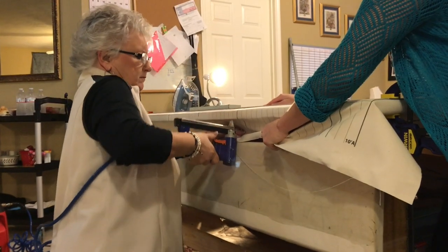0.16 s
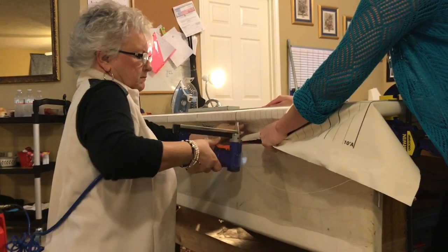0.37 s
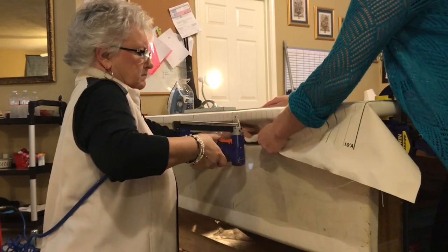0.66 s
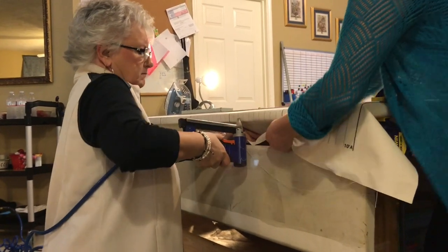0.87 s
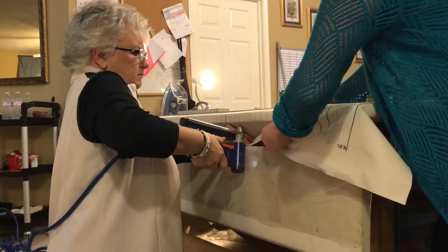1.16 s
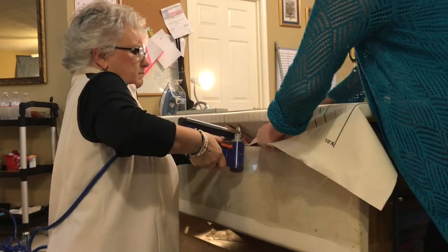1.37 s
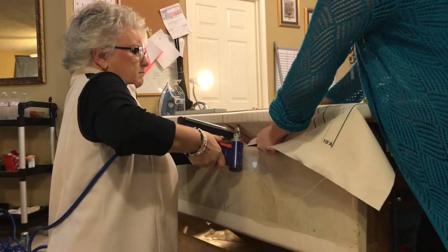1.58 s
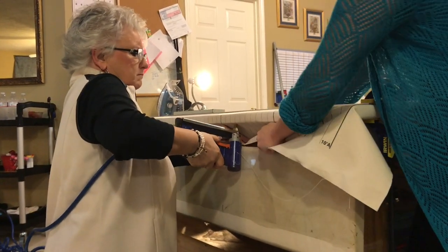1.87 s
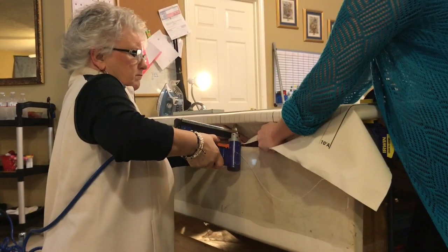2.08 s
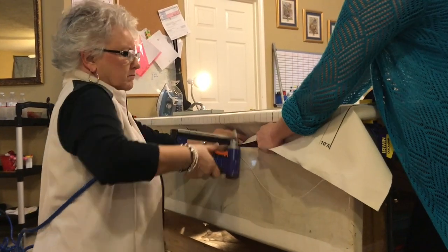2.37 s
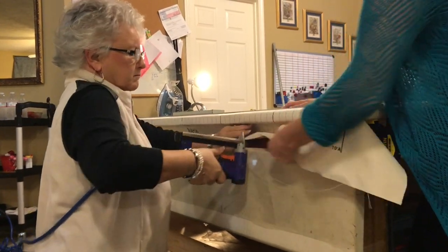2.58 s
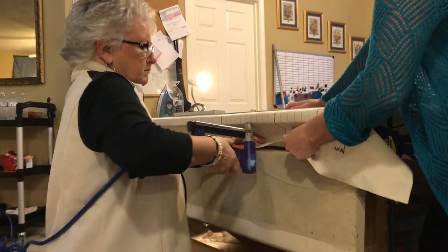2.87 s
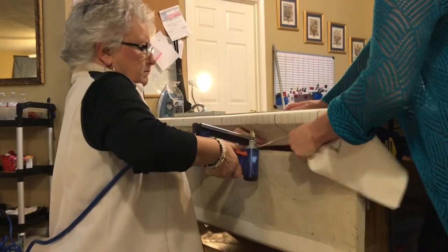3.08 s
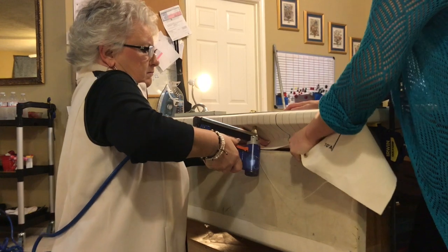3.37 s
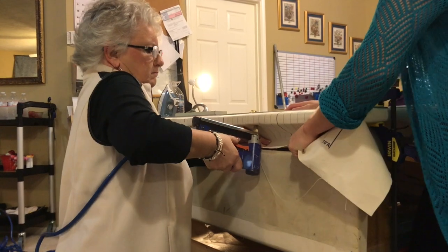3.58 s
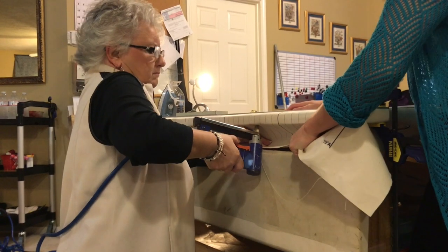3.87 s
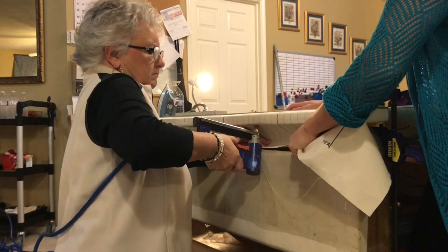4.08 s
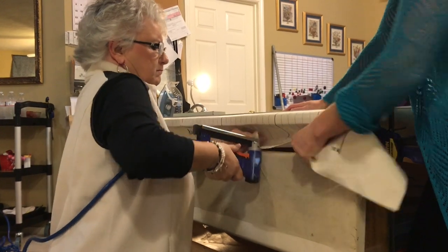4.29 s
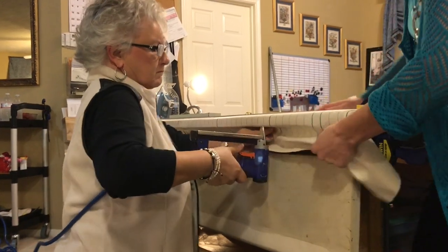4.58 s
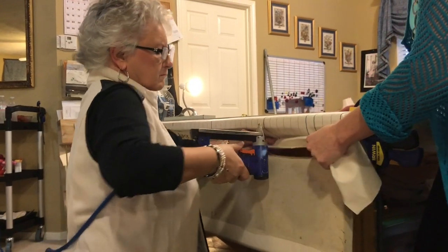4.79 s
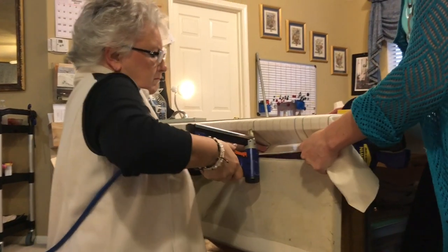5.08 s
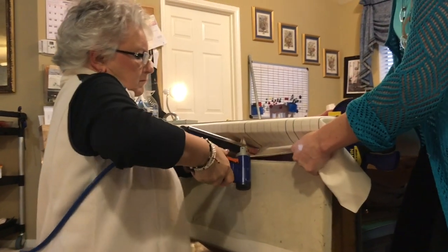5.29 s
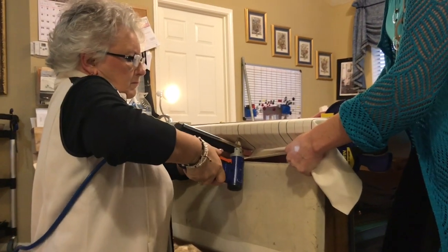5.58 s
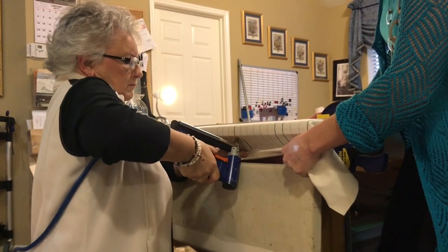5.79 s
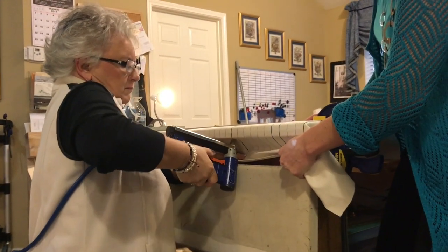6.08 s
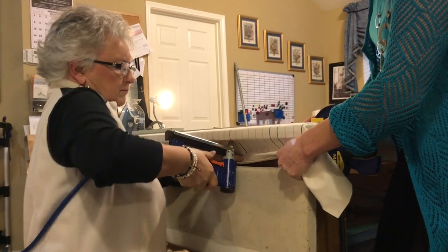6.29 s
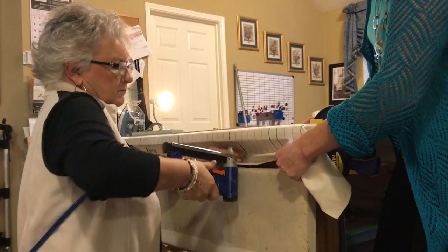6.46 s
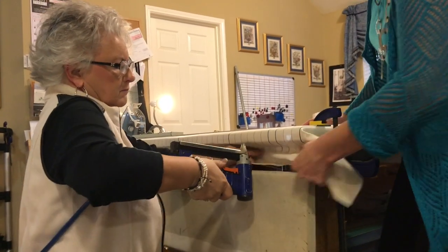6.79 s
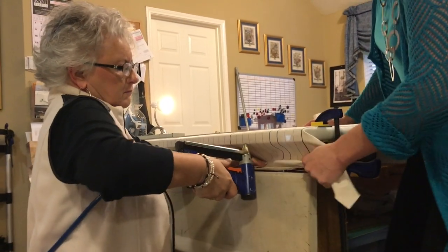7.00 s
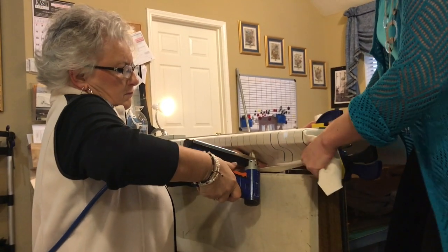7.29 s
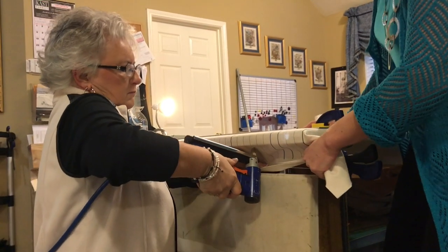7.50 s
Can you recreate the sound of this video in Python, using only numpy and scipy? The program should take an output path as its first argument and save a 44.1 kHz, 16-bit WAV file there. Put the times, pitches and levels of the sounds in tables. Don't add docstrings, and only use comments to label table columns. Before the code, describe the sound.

An air staple gun fires sharp double cracks into a hollow wooden box in a small workroom, with cloth rustling and soft bumps between shots.

```python
import sys
import numpy as np
from scipy import signal
from scipy.fft import rfft, irfft
from scipy.io import wavfile
from scipy.ndimage import uniform_filter1d

SR = 44100
rng = np.random.default_rng(int(sys.argv[2]) if len(sys.argv) > 2 else 0)


def bounce(signal):
    frames = np.transpose(np.atleast_2d(signal))
    limited = np.clip(frames, -1, 1)
    pcm = np.round(limited * 32767).astype(np.int16)
    wavfile.write(sys.argv[1], SR, pcm)


def voltage_ratio(level):
    return 10 ** (np.asarray(level, float) / 20)


N = 336483
LEAD = 8820

# start in seconds, level in dB, hold in ms, tilt in dB per octave.
INLETS = [
    (-.08, -7, 14, -1.5),
    (2.064, -11.5, 16, -3),
    (3.907, -14, 19, -4.5),
    (6.075, -15.5, 12, 1.5),
    (6.088, -13, 18, -1.5),
]
INLET_RISE_MS, INLET_FALL_MS = 6.1, 14
# pitch in Hz, level in dB per Hz.
AIR_COLOUR = [(180, -65), (300, -33), (654, -29), (2120, -9), (2640, -11), (4630, -6.5), (5120, -8.5),
              (5750, -8), (6460, -5.5), (13400, -8.5), (15800, -10.5)]
# start in seconds, level in dB, rattle in ms, tilt in dB per octave, boom in dB.
BLOWS = [(-.078, -12.5, 43.5, 0.5, -18), (2.063, -13.5, 20.2, 1.1, -19.5), (2.086, -12.5, 19.9, 1, -25),
         (3.908, -15, 19.7, -5, -26.5), (3.927, -15.5, 18, -1.7, -24.5), (6.097, -10.5, 8.8, 3.5, -15),
         (6.108, -12, 5, 4.5, -26)]
# pitch in Hz, level in dB, time to fall 60 dB in seconds.
BOX = [(700, -23.5, 0.015), (829, -6, 0.1), (991, -2.5, 0.072), (1200, -2, 0.042), (1270, 5, 0.0028),
       (1567, -0.5, 0.028), (1930, 2, 0.018), (2330, -1.5, 0.0061), (2450, -0.5, 0.033),
       (2740, -4.5, 0.011), (2900, -8, 0.013), (3900, -11, 0.0079)]
# pitch in Hz, level in dB, time to fall 60 dB in seconds.
HOLLOW = [(250, -12, .04), (327, 10, 0.13), (385, 10, 0.096), (490, -4.5, 0.053)]

# pitch in Hz, level in dB per Hz.
HUSH_COLOUR = [(35, -66), (60, -28.5), (96, -28.5), (130, -12), (171, -13), (227, -4), (286, -8.5),
               (436, -9.5), (1940, -18), (13400, -31), (15800, -34)]
HUSH_DB = -62.5
# time in seconds, pitch in Hz, level in dB.
MOTOR = [(0, 254.6, -52.5), (1.0, 258.8, -67), (1.9, 250, -67), (2.601, 246, -66), (3.3, 239.1, -75.5),
         (3.8, 244.6, -66.5), (4.6, 234.7, -69.5), (5.2, 228.1, -67.5), (6.0, 231.2, -64.5),
         (6.6, 226, -61), (6.95, 225.7, -53), (7.3, 223, -63.5), (7.63, 220.8, -61)]
HUM_HZ, HUM_DB = 121, -70.5

# start in seconds, level in dB, rise in ms.
VENTS = [(.124, -20.5, 9.6), (2.284, -20.5, 9), (4.137, -22, 4.7), (6.346, -22, 8.4)]
VENT_SHUTS_MS, VENT_FALL_MS, VENT_TILT_DB = 3.7, 3.9, -1.7
# start in seconds, level in dB, rattle in ms, pitch factor, pushed air in dB.
POPS = [(.128, -14, 8.3, 1.05, -8), (.146, -23.5, 8.8, 0.62, 4), (2.280, -24, 11.5, 0.77, -13.5),
        (2.287, -20.5, 13, 1.07, -16.5), (2.306, -18.5, 11.1, 1.35, -16.5), (4.138, -15.5, 6.8, .93, -7),
        (4.158, -24.5, 9.6, 0.82, -9), (4.169, -20.5, 8.4, 1.41, -14.5), (6.339, -32, 4.7, 1.6, -17.5),
        (6.346, -22, 16.4, 0.81, -12.5), (6.357, -19, 18, 1.1, -9.5), (6.372, -21.5, 10, 1.4, -10.5)]
POP_TILT_DB = 2.5
# pitch in Hz, level in dB, time to fall 60 dB in seconds.
CHAMBER = [(626, -10, 0.01), (770, -4, 0.0047), (910, 4.5, 0.019), (1090, 3.5, 0.015), (1300, 3, 0.0092),
           (1524, 3.5, 0.011), (2257, -13.5, 0.02)]
# pitch in Hz, level in dB, time to fall 60 dB in seconds.
PUSHED_AIR = [(200.2, -15.5, 0.028), (338, -4, 0.039), (385, 8, 0.052), (447, 3, 0.087)]

# start in seconds, level in dB, barrel ring in dB, puff in dB,
# puff tilt in dB per octave.
CLACKS = [(.161, -19.5, -14.5, -13, 4), (2.310, -24, 0.7, -11.5, 2.5), (4.170, -18, -9.5, -14.5, 0.5),
          (6.372, -23.5, -14, -11.5, 0.7)]
# pitch in Hz, level in dB, time to fall 60 dB in seconds.
PISTON = [(7370, -7, 0.039), (9500, -13, .07), (9700, 0.5, .065), (14110, -9.5, .05)]
BARREL_HZ, BARREL_T60 = 3780, .1
# rise, hold and fall in ms.
PUFF_MS = (4, 5.4, 4.9)
PUFF_LEAD_S = .0012

# time in seconds, drag on the box in dB.
SLIDES = [
    [(.3, -56), (.486, -49.5), (.626, -55), (.728, -49.5), (.954, -48), (1.042, -53), (1.224, -62.5),
     (1.644, -67), (2.03, -69)],
    [(2.48, -50), (2.952, -50.5), (3.04, -51.5), (3.076, -54.5), (3.168, -58), (3.44, -67.5), (3.87, -69.5)],
    [(4.32, -46), (4.728, -50.5), (4.81, -55), (4.942, -57.5), (5.062, -72.5), (6.03, -66.5)],
    [(6.52, -46.5), (6.622, -50), (6.84, -48.5), (7.008, -56), (7.202, -64), (7.63, -66)],
]
WEAVE_DB = (-56.5, -55.5, -54, -55)
FIRM_DRAG_DB, WEAVE_GROWTH = -50, 1.2
# pitch in Hz, level in dB per Hz.
RUB_COLOUR = [(71, -47), (120, -15.5), (210, -15), (243, -2.5), (294, -8.5), (430, -4.5), (762, -6.5),
              (1220, -7), (4000, -26.5), (5200, -50), (8800, -120)]
# pitch in Hz, level in dB per Hz.
WEAVE_COLOUR = [(880, -37.5), (1500, -8.5), (2000, -12), (2430, -10.5), (3470, -12.5), (6330, -15),
                (14300, -23), (15800, -25)]
# middle in seconds, level in dB, half length in seconds.
BRUSHES = [(0.875, -64, 0.2), (1.267, -63.5, 0.1), (1.956, -76, .06), (3.05, -67, .05), (3.663, -76.5, .08),
           (5.899, -71, 0.067), (7.47, -70, .12)]
SCUFF_DB, SCUFF_S = -31, 0.041

# time in seconds, peak in dB, pitch in Hz, brightness in dB.
BUMPS = [(.47, -26.5, 368, -7), (.505, -34, 496, -5), (.526, -30, 385, 8), (.567, -30.5, 415, -2),
         (.661, -32, 423, -13), (.687, -23, 433, -5), (.728, -22, 413, -.6), (.749, -28, 645, -6),
         (1.237, -26, 420, -7), (2.749, -33, 447, 0.1), (2.774, -31, 594, 4), (3.133, -33.5, 345, -12),
         (3.17, -34, 336, -10), (4.549, -37, 634, -3), (4.634, -26.5, 595, -4), (4.695, -36, 326, -5),
         (5.384, -40, 519, 5), (5.919, -45, 369, -4.5), (6.624, -26.5, 590, -14), (6.66, -24, 302, -3),
         (6.689, -31.5, 635, -15), (6.81, -24, 345, 2), (6.868, -28.5, 444, -7), (6.986, -30, 480, -6),
         (7.251, -41, 585, -10)]
BUMP_T60, BUMP_RISE_MS = 0.046, 4.6

# start in seconds, level in dB, tilt in dB per octave.
LEAKS = [(2.267, -24.5, -1.5), (3.896, -40, 5), (4.127, -25.5, -2), (6.062, -29, 3.5), (6.330, -30, 5)]
# rise, hold and fall in ms.
LEAK_MS = (8.6, 5.5, 3.1)

# pitch in Hz, level in dB, time to fall 60 dB in seconds.
THUD = [(149, -17.5, 0.047), (336, -10.5, 0.14), (453, -3.5, .04), (596, 2.5, 0.03), (745, -1, 0.029),
        (1006, -8, 0.026), (1600, -16, 0.014)]
THUD_S, THUD_DB = 2.9022, -12

# pitch in Hz, level in dB,
# time to fall 60 dB in seconds.
BOARD = [(1036, -5, 0.054), (1218, 4, 0.045), (1356, -2, 0.034), (1510, -0.5, 0.045), (1670, -4.5, .035),
         (1850, -3, 0.033), (2070, -4, 0.027), (2306, -5.5, .03), (2480, -4, 0.028), (2630, -6, .03)]
SLAM_S, SLAM_DB, BITE_MS = 6.096, -2, 2.5

# pitch in Hz, time to fall 60 dB in seconds.
ROOM = [(150, 0.34), (400, 0.42), (1000, 0.39), (2500, 0.45), (6000, 0.41), (14000, .24)]
# delay in ms, level in dB.
WALLS = [(2.3, -6), (4.1, -15.5), (7.2, -12), (11.5, -13.5), (16, -10.5)]
WET_DB = -2


def evened(x):
    return x / np.sqrt(np.mean(x ** 2) + 1e-20)


def read(points, hz):
    f, value = np.transpose(points)
    return np.interp(np.log(hz + 1), np.log(f + 1), value)


def silence():
    return np.zeros(N + LEAD)


def add(mix, s, sound):
    part = mix[round(s * SR) + LEAD:][:len(sound)]
    part += sound[:len(part)]


def hiss(colour, size, tilt_db=0.):
    hz = np.fft.rfftfreq(size, 1 / SR)
    gain = voltage_ratio(read(colour, hz) + tilt_db * np.log2((hz + 50) / 6000))
    return evened(irfft(rfft(rng.standard_normal(size)) * gain, size))


def drift(size, smooth):
    once = uniform_filter1d(rng.standard_normal(size), smooth)
    return evened(uniform_filter1d(once, smooth))


def ring(modes, pitch=1., tilt_db=0., detune=.07):
    t = np.arange(5000)[:, None] / SR
    hz, db, t60 = np.tile(np.transpose(modes), 3)
    hz = hz * pitch * (1 + detune * rng.uniform(-1, 1, len(hz)))
    db = db + tilt_db * np.log2(hz / 1200) + rng.standard_normal(len(hz))
    x = (voltage_ratio(db - 60 * t / t60) * np.sin(2 * np.pi * hz * t)).sum(1)
    return x / np.sqrt(np.mean(x[:300] ** 2))


def add_jet(mix, s, db, rise_ms, hold_ms, fall_ms, tilt_db):
    ms = np.arange(-1024, 3072) / SR * 1000
    swell_db = 30 * np.minimum(ms / rise_ms, 0)
    fade_db = 20 * np.maximum(ms - hold_ms, 0) / fall_ms
    level = voltage_ratio(db + swell_db - fade_db + 1.5 * drift(len(ms), 40))
    add(mix, s - 1024 / SR, level * hiss(AIR_COLOUR, len(ms), tilt_db))


def blow(modes, hollow, per_s, db, rattle_ms, pitch, tilt_db, boom_db):
    ms = np.arange(3000) / SR * 1000
    signs = rng.choice([-1, 1], len(ms))
    knocks = signs * (rng.random(len(ms)) < per_s / SR) * (ms < rattle_ms)
    knocks[0] = 1
    body = ring(modes, pitch, tilt_db) + voltage_ratio(boom_db) * ring(hollow, detune=0.059)
    x = signal.fftconvolve(knocks, body)
    loud_part = x[:round(rattle_ms * SR / 1000) + 200]
    return voltage_ratio(db) * x / np.sqrt(np.mean(loud_part ** 2))


def inlet_air():
    mix = silence()
    for s, db, hold_ms, tilt_db in INLETS:
        add_jet(mix, s, db, INLET_RISE_MS, hold_ms, INLET_FALL_MS, tilt_db)
    return mix


def driver_blows():
    mix = silence()
    panel = signal.butter(2, 260, "high", fs=SR, output="sos")
    for s, db, rattle_ms, tilt_db, boom_db in BLOWS:
        sound = blow(BOX, HOLLOW, 1800, db, rattle_ms, 1, tilt_db, boom_db)
        add(mix, s, signal.sosfilt(panel, sound))
    return mix


def background():
    t = np.arange(N) / SR
    s, hz, db = np.transpose(MOTOR)
    turns = np.cumsum(np.interp(t, s, hz) + 1.1 * drift(N, 2500)) / SR
    motor = voltage_ratio(np.interp(t, s, db) + 0.83 * drift(N, 1800)) * np.sin(2 * np.pi * turns)
    hum = voltage_ratio(HUM_DB + 1.3 * drift(N, 3000)) * np.sin(2 * np.pi * HUM_HZ * t)
    return voltage_ratio(HUSH_DB) * hiss(HUSH_COLOUR, N) + np.sqrt(2) * (motor + hum)


def exhaust_vents():
    mix = silence()
    for (open_s, db, rise_ms), (clack_s, *_) in zip(VENTS, CLACKS):
        hold_ms = (clack_s - open_s) * 1000 - VENT_SHUTS_MS
        add_jet(mix, open_s, db, rise_ms, hold_ms, VENT_FALL_MS, VENT_TILT_DB)
    return mix


def valve_pops():
    mix = silence()
    for s, db, rattle_ms, pitch, push_db in POPS:
        add(mix, s, blow(CHAMBER, PUSHED_AIR, 700, db, rattle_ms, pitch, POP_TILT_DB, push_db))
    return mix


def piston_clacks():
    mix = silence()
    for s, db, barrel_db, puff_db, tilt_db in CLACKS:
        add_jet(mix, s - PUFF_LEAD_S, puff_db, *PUFF_MS, tilt_db)
        metal = PISTON + [(BARREL_HZ, barrel_db, BARREL_T60)]
        add(mix, s, voltage_ratio(db) * ring(metal, detune=0.014))
    return mix


def cloth():
    mix = silence()
    for rows, weave_db in zip(SLIDES, WEAVE_DB):
        s, drag_db = np.transpose(rows)
        t = np.arange(s[0] - .15, s[-1] + .05, 1 / SR)
        rub_db = np.interp(t, s, drag_db)
        scuff = sum(voltage_ratio(db + SCUFF_DB - 20 * abs(t - at - .02) / SCUFF_S) for at, db, *_ in BUMPS)
        grain_db = 2 * drift(len(t), 150)
        rub = hiss(RUB_COLOUR, len(t)) * (voltage_ratio(rub_db) + scuff) * voltage_ratio(grain_db)
        brush = sum(voltage_ratio(db - 20 * ((t - at) / length) ** 2) for at, db, length in BRUSHES)
        level = voltage_ratio(weave_db + WEAVE_GROWTH * (rub_db - FIRM_DRAG_DB)) + brush
        weave = hiss(WEAVE_COLOUR, len(t)) * level * voltage_ratio(1.2 * drift(len(t), 300))
        fade_in = np.clip((t - t[0]) / 0.18, 0, 1)
        add(mix, t[0], (rub + weave) * fade_in)
    return mix


def soft_swell():
    ms = np.arange(5000) / SR * 1000
    rise = np.sin(np.pi / 2 * np.minimum(ms / BUMP_RISE_MS, 1)) ** 2
    return rise * np.exp(-(ms / 150) ** 4)


def bumps():
    mix, t60 = silence(), BUMP_T60
    for s, db, hz, bright_db in BUMPS:
        modes = [(hz, 0, t60), (hz * 0.614, -10, t60 * 1.5), (hz * .82, -5, t60),
                 (hz * 1.117, -3, t60 * 0.5), (hz * 1.5, -4, t60 * 0.6),
                 (hz * 2.0, bright_db, t60 * .5), (hz * 2.7, bright_db, t60 * 0.58),
                 (hz * 3.3, bright_db - 6.5, t60 * 0.38), (hz * 4.1, bright_db - 7.0, t60 * 0.21)]
        knock = ring(modes, detune=0.077) * soft_swell()
        add(mix, s - BUMP_RISE_MS / 3000, voltage_ratio(db - 1.5) * knock)
    return mix


def trigger_leaks():
    mix = silence()
    for s, db, tilt_db in LEAKS:
        add_jet(mix, s, db, *LEAK_MS, tilt_db)
    return mix


def box_thud():
    mix = silence()
    add(mix, THUD_S, voltage_ratio(THUD_DB) * ring(THUD, detune=.06) * soft_swell())
    return mix


def slam():
    mix, ms = silence(), np.arange(5000) / SR * 1000
    bite = np.minimum(ms / BITE_MS, 1)
    add(mix, SLAM_S, voltage_ratio(SLAM_DB) * ring(BOARD, detune=.03) * bite)
    return mix


def knocks_and_air(slam_db=0., bump_db=0.):
    gun = inlet_air() + driver_blows() + exhaust_vents() + valve_pops() + piston_clacks() + trigger_leaks()
    x = gun + voltage_ratio(slam_db) * slam() + voltage_ratio(bump_db) * (bumps() + box_thud())
    return signal.sosfilt(signal.butter(2, 150, "high", fs=SR, output="sos"), x)


def room_tail():
    taps, at = np.zeros(SR), np.arange(300, SR - 12, 12)
    taps[at + rng.integers(0, 12, len(at))] = rng.choice([-1., 1.], len(at))
    taps *= np.minimum(np.arange(SR) / 900, 1)
    hz, lag, z = signal.stft(taps, SR, nperseg=256)
    decay = voltage_ratio(-60 * lag / read(ROOM, hz)[:, None])
    tail = signal.istft(z * decay, SR, nperseg=256)[1]
    return tail / np.linalg.norm(tail)


def room():
    direct = knocks_and_air()
    out = direct.copy()
    for ms, db in WALLS:
        lag = round(ms * SR / 1000)
        out[lag:] += voltage_ratio(db) * direct[:-lag]
    for _ in range(8):
        source = knocks_and_air(slam_db=-4.5, bump_db=-3)
        out += voltage_ratio(WET_DB - 9) * signal.fftconvolve(source, room_tail())[:len(out)]
    return out


def scene():
    near = voltage_ratio(-3.5) * room() + cloth()
    return (near[LEAD:] + background())[None]


def roll_off(x):
    return signal.sosfilt(signal.butter(12, 15970, fs=SR, output="sos"), x)


def record(dry):
    x = signal.sosfilt(signal.butter(4, 105, "high", fs=SR, output="sos"), dry)
    squashed = np.sign(x) * (.8 + .2 * np.tanh((abs(x) - .8) / .2))
    x = np.where(abs(x) < .8, x, squashed)
    treble_limit = signal.firwin(767, 15480, window=("kaiser", 8), fs=SR)
    x = signal.oaconvolve(x, treble_limit[None], "same")
    return roll_off(np.clip(x, -1, 1))


dry = scene()
out = record(dry)
bounce(out)
```